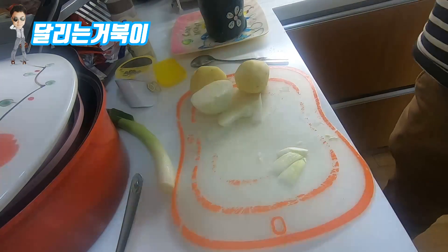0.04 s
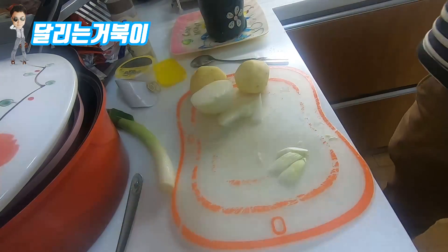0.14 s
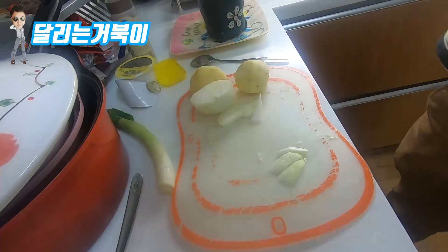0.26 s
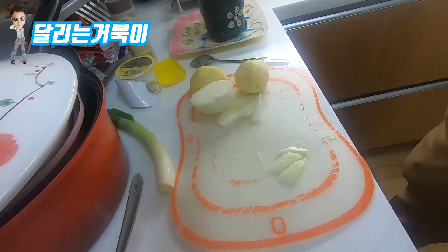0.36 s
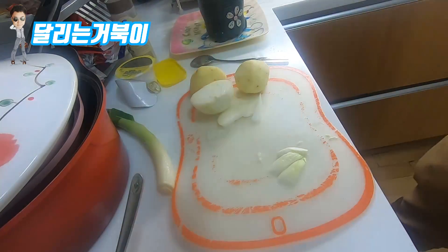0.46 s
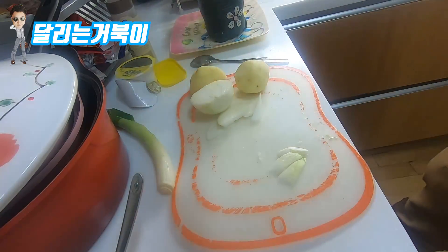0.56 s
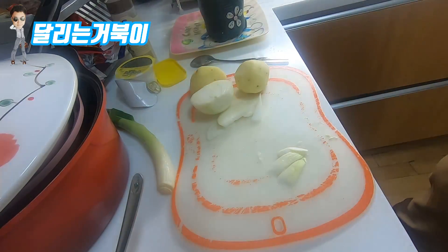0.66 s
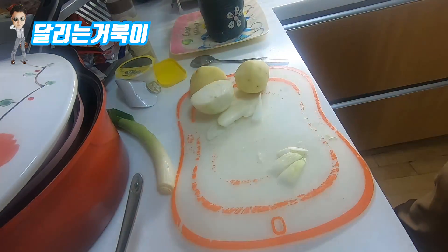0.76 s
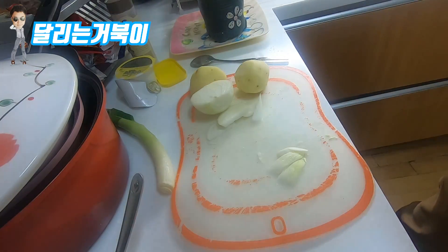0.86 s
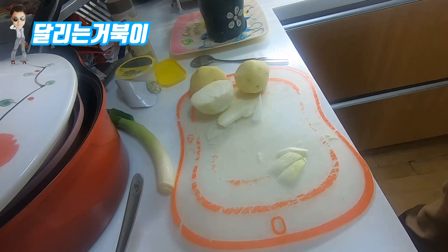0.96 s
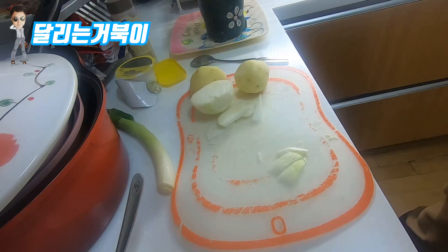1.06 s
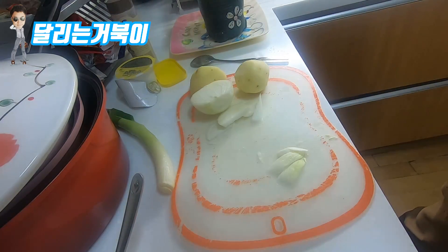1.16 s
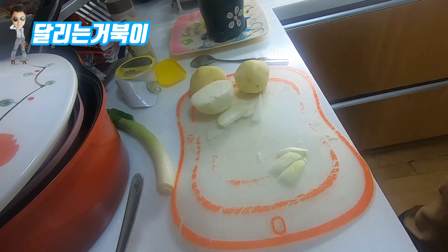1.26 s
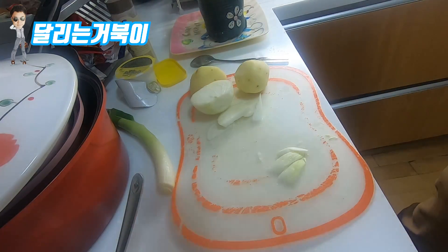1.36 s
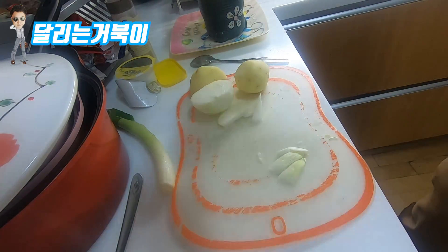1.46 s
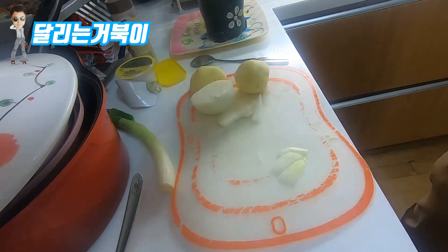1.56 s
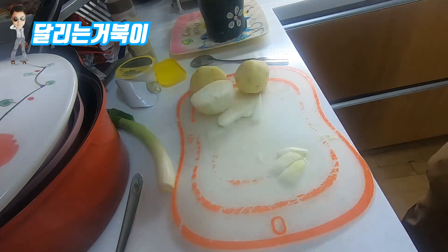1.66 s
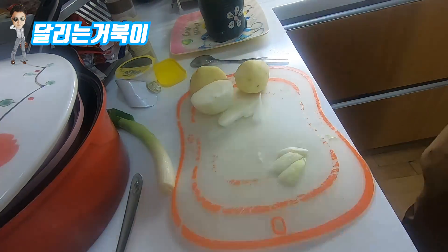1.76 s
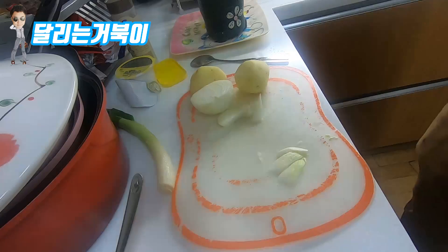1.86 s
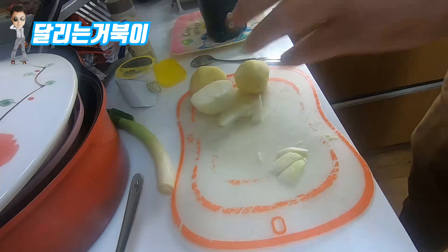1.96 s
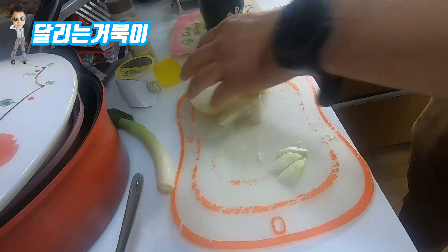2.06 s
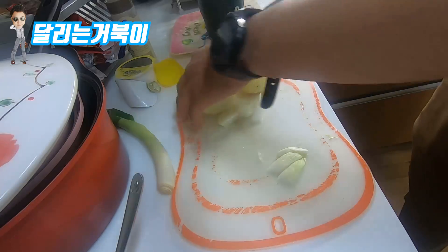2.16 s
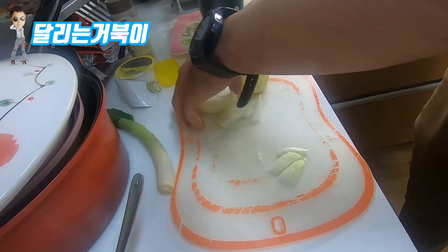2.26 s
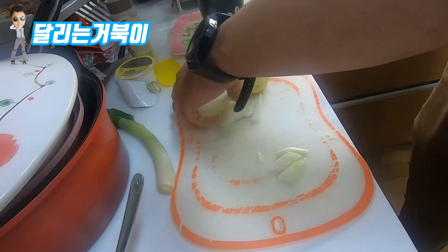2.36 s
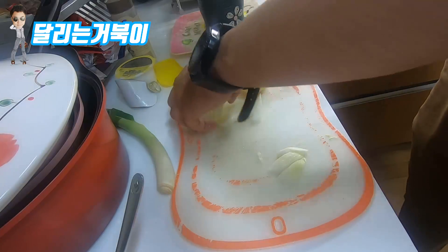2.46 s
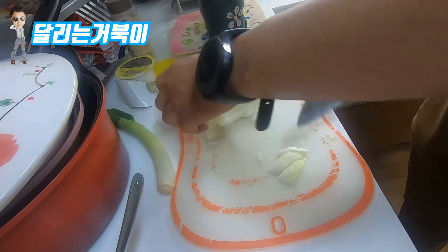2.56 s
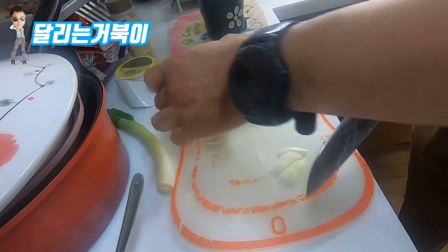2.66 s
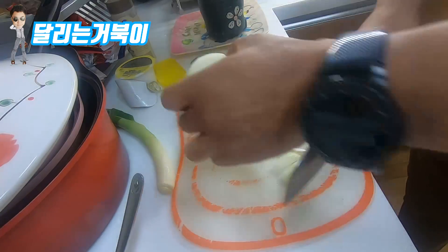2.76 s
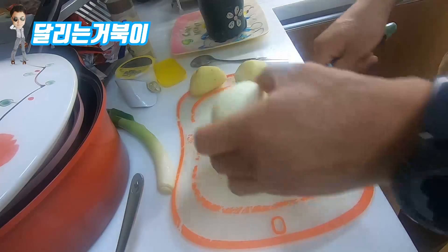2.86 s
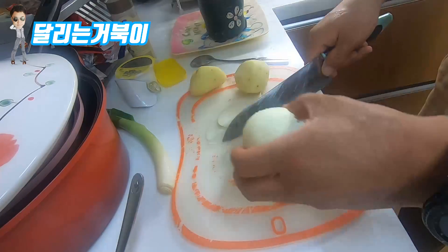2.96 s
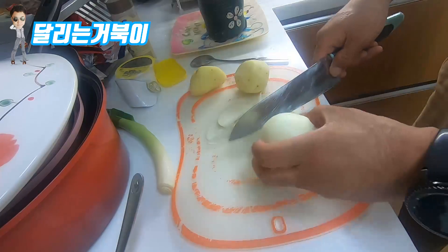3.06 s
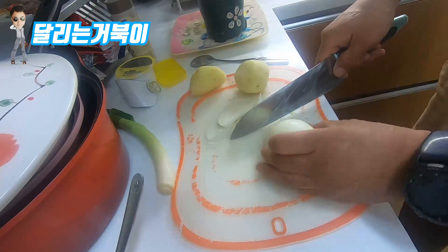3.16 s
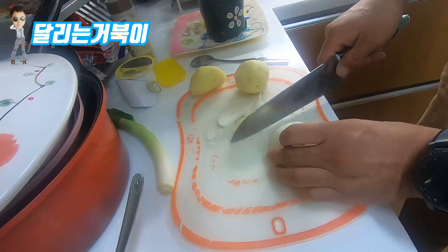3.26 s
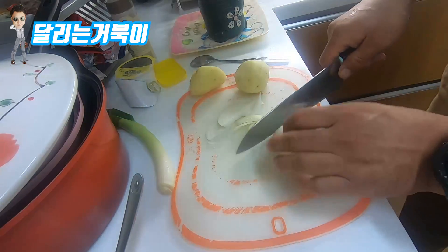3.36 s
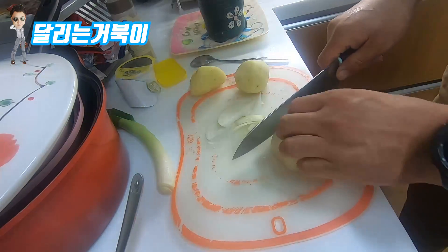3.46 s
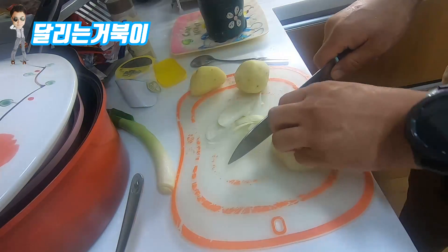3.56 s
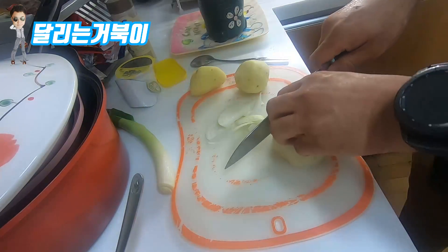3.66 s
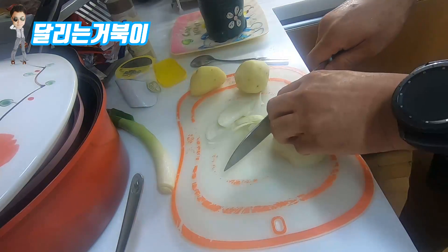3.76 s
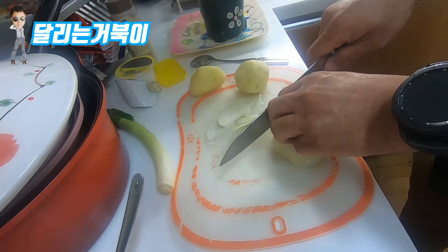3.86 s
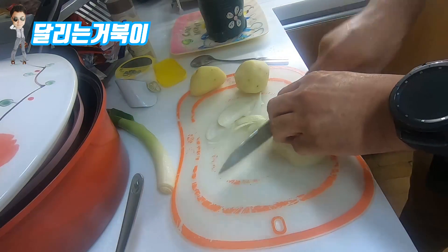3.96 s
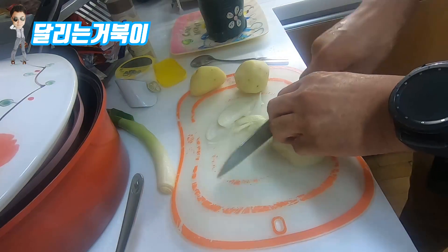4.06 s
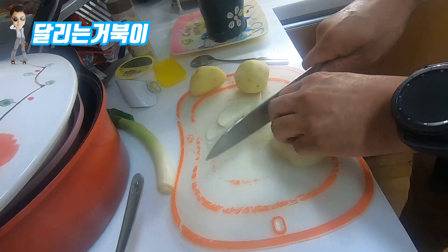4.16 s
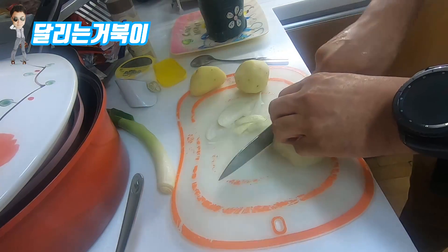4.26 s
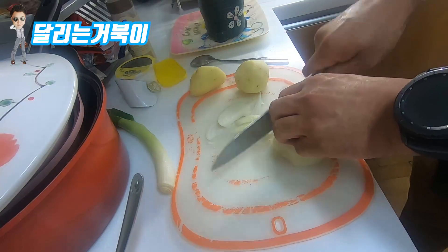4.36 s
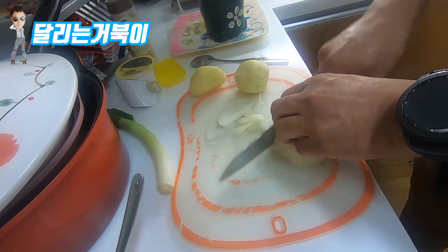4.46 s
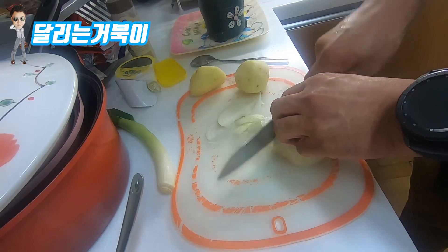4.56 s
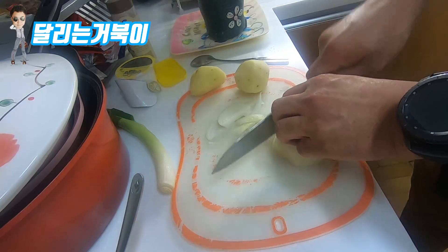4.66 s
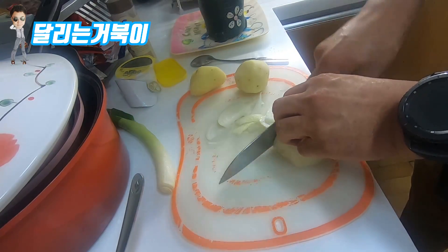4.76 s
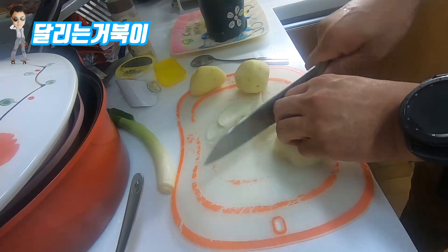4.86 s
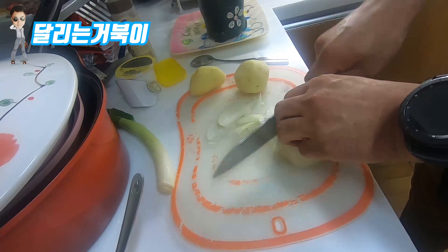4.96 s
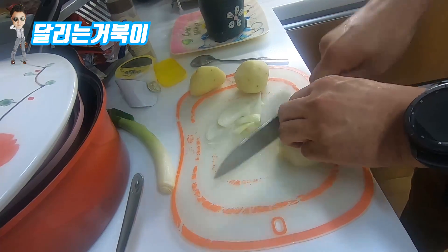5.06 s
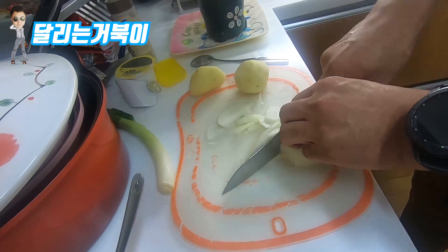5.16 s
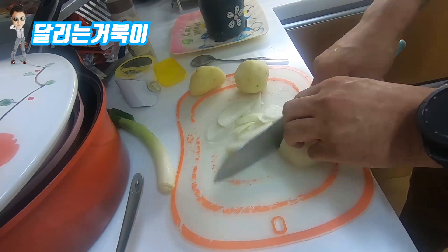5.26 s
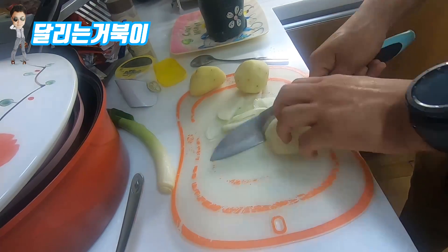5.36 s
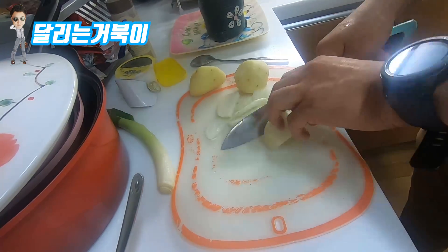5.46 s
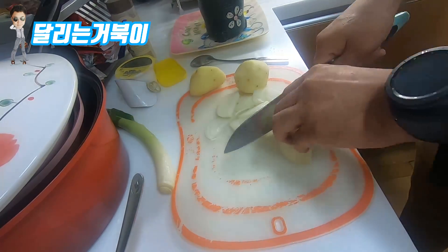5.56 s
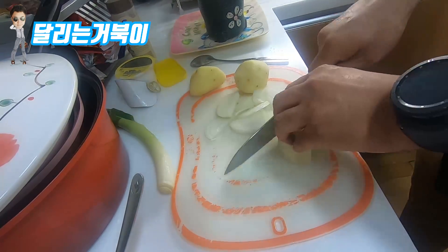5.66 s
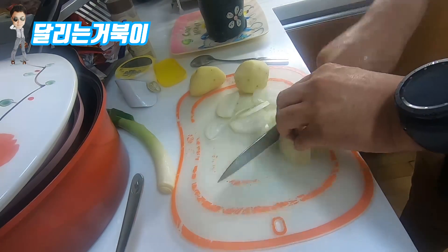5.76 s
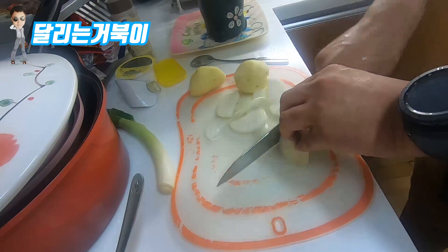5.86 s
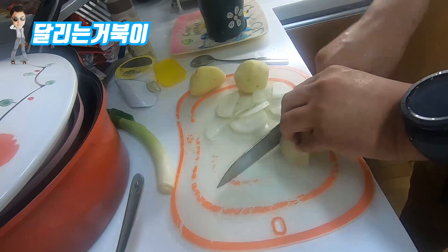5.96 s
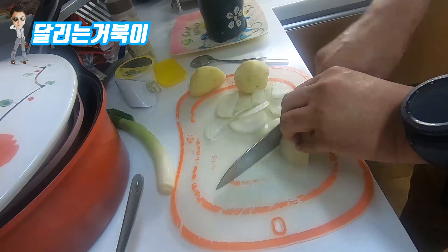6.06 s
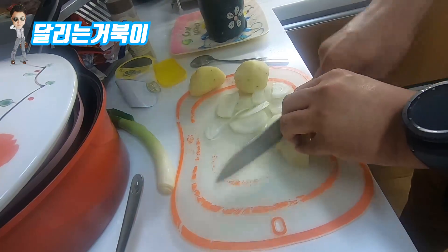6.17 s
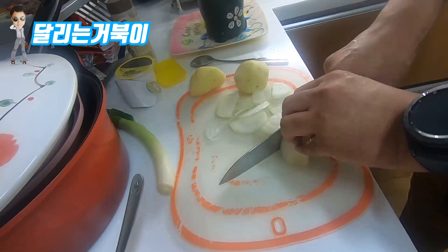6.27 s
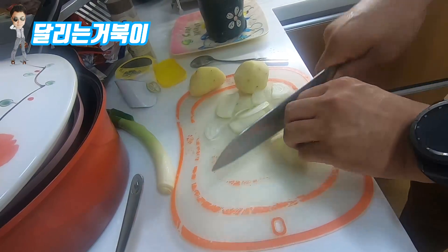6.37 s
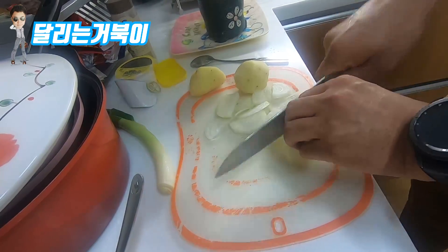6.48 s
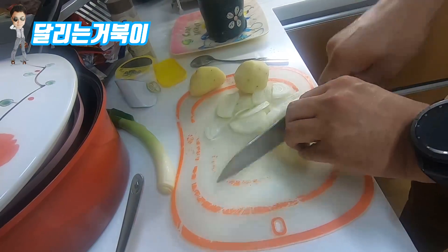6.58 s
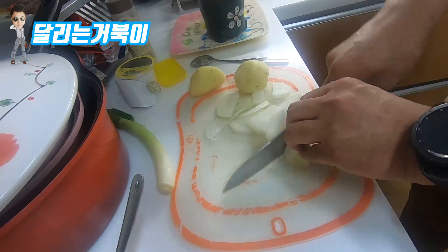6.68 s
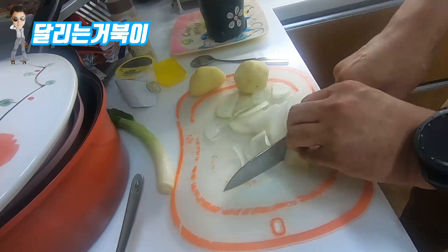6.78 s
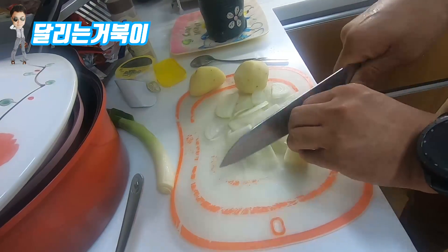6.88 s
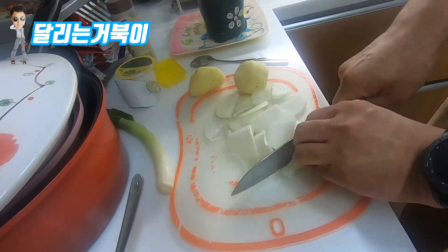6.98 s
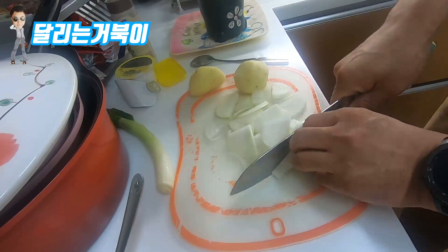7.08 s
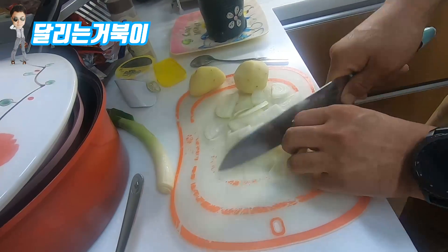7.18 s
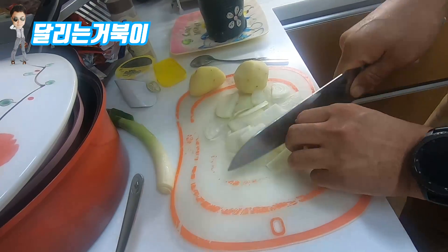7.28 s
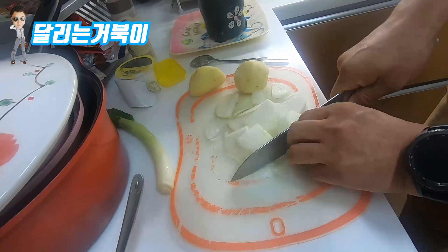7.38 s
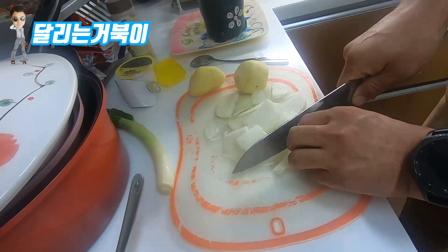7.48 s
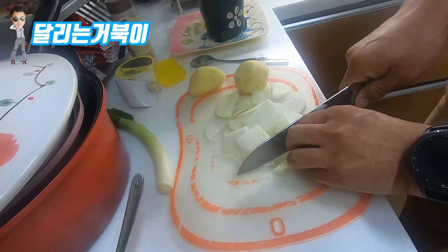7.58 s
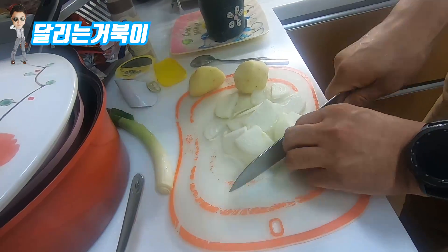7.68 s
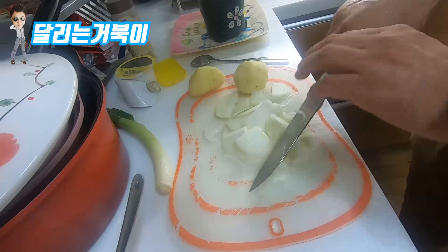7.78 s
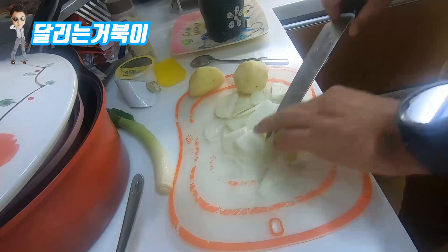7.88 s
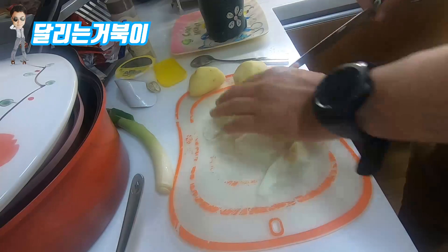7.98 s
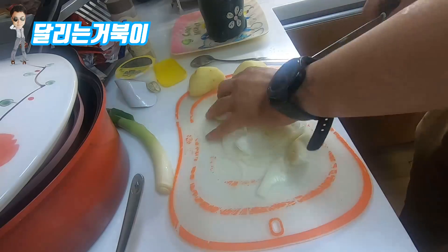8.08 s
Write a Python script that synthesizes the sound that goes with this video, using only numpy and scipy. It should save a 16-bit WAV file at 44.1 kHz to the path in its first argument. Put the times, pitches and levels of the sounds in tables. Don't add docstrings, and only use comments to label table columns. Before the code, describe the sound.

In a small, reflective kitchen heard close through a small camera microphone, fan-like hush and low rumble carry faint ticks and soft thuds. A blade tip taps and scrapes a plastic board, and an onion lands heavily. Slow strokes follow, each a wet crisp crunch ending in a hard ringing clack. Midway, playback speeds up, making the chops quicker, higher and shorter, with small rubs between groups.

```python
import sys
import numpy as np
from scipy import signal
from scipy.fft import rfft, irfft, next_fast_len
from scipy.io import wavfile
from scipy.ndimage import uniform_filter1d, map_coordinates

SR = 44100
rng = np.random.default_rng(int(sys.argv[2]) if len(sys.argv) > 2 else 0)


def generate_wav(signal):
    frames = np.transpose(np.atleast_2d(signal))
    scaled = np.clip(frames, -1, 1) * 32767
    pcm = np.round(scaled).astype(np.int16)
    wavfile.write(sys.argv[1], SR, pcm)


def decibels_to_gain(level_db):
    exponent = np.asarray(level_db, float) / 20
    return 10 ** exponent


N = 358516
SPEED_UP_S, SPEED = 4.983, 2.53
CUT = round(SPEED_UP_S * SR)
LONG = CUT + int(np.ceil((N - CUT) * SPEED))


def kitchen(s):
    return s + np.maximum(np.asarray(s) - SPEED_UP_S, 0) * (SPEED - 1)


def pace_at(s):
    return SPEED if s > SPEED_UP_S else 1


def add(track, s, sound):
    i = round(float(kitchen(s)) * SR)
    track[i:i + len(sound)] += sound[:len(track) - i]


def unit(x):
    return x / np.sqrt(np.mean(x ** 2) + 1e-20)


def along(points, hz, axis=1):
    rows = np.transpose(points)
    return np.interp(np.log(hz + 1), np.log(rows[0] + 1), rows[axis])


def filtered(x, response):
    m = next_fast_len(x.shape[-1] + SR // 2)
    return irfft(rfft(x, m) * response(np.fft.rfftfreq(m, 1 / SR)), m)[..., :x.shape[-1]]


def body(modes):
    def response(f):
        total = 0
        for k, (hz, width_hz, db) in enumerate(modes):
            mode = 1j * f / (hz * hz - f * f + 1j * f * width_hz) / 2
            total = total + (-1) ** k * decibels_to_gain(db) * SR / np.pi * mode
        return total
    return response


def pair(mid, side, alike):
    turn = np.arccos(np.clip(alike, -1, 1)) / 2
    return np.array([mid * np.cos(turn) + side * np.sin(turn), mid * np.cos(turn) - side * np.sin(turn)])


def grainy(count, spike_db):
    size = np.repeat(decibels_to_gain(spike_db * rng.exponential(size=count // 24 + 1)), 24)[:count]
    return unit(size * rng.standard_normal(count))


def burst(db, t60_s, length=SR // 40):
    t = np.arange(length) / SR
    return decibels_to_gain(db - 60 * t / t60_s) * rng.standard_normal(length)


def push(width_s):
    f = np.sin(np.linspace(0, np.pi, round(width_s * SR) + 3))
    return f / f.sum()


def ring(db, hz, width_hz, rise_s):
    t = np.arange(SR // 40) / SR
    return decibels_to_gain(db) * np.minimum(t / rise_s, 1) * np.exp(-np.pi * width_hz * t) * np.sin(2 * np.pi * hz * t)


def after(blows, shape):
    return np.abs(signal.fftconvolve(blows, shape(np.arange(4 * SR) / SR))[:LONG])


def patches(shape, size):
    over_hz = uniform_filter1d(rng.standard_normal(shape), size=size[0], axis=0)
    return unit(uniform_filter1d(over_hz, size=size[1], axis=1))


def pumping():
    pull_db, recover_s = 5.5, 0.5
    loud = np.zeros(LONG)
    for s, db, *_ in [*CHOPS, *DROPS]:
        add(loud, s, [decibels_to_gain(db + 3.5)])
    return -pull_db * (1 - np.exp(-after(loud, lambda t: np.exp(-t / recover_s))))


# frequency in Hz, level in dB per Hz.
HUSH = [(15, -65.5), (25, -27), (101, -47.5), (172, -2), (465, -19.5), (1130, -15), (1560, -19),
        (1880, -16.5), (2390, -25.5), (3040, -19.5), (3380, -21.5), (4310, -15), (7570, -15), (9380, -6),
        (11000, -20), (15200, -33)]
# frequency in Hz, width in Hz, height in dB.
HUMPS = [(195, 100, 8.5), (745, 100, 10.5), (1160, 270, 12), (2065, 600, 11.5), (2940, 400, 10),
         (3500, 350, -2), (4390, 530, 6), (6570, 390, 5), (9230, 264, 8), (9750, 180, 7.5)]
# frequency in Hz, left-right likeness (-1 to 1).
HUSH_ALIKE = [(60, 0.21), (130, 1), (290, 0.41), (640, -0.14), (1410, 0.36), (3100, 0.64), (6820, -0.11),
              (15000, 0.16)]


def hush():
    hush_db, dropout_hz, dropout_db = -47.5, 10600, -30
    masked_hz, masked_share = 7140, 0.38
    hz, t, z = signal.stft(rng.standard_normal((2, LONG + 1024)), SR, nperseg=1024)
    pull_db = pumping()
    field_db = 1.2 * patches(z.shape[1:], size=(8, 6))
    lost = (patches(z.shape[1:], size=(5, 4)) < -0.75) & (hz > dropout_hz)[:, None]
    masked_db = masked_share * np.outer(hz > masked_hz, np.interp(t * SR, np.arange(LONG), pull_db))
    colour_db = along(HUSH, hz) + sum(db / (1 + (2 * (hz - c) / w) ** 2) for c, w, db in HUMPS)
    gain_db = colour_db[:, None] + field_db + dropout_db * lost + masked_db
    z = pair(*z, along(HUSH_ALIKE, hz)[:, None]) * decibels_to_gain(gain_db)
    air = signal.istft(z, SR, nperseg=1024)[1][:, :LONG]
    return decibels_to_gain(hush_db + pull_db + [[-1.2], [1.2]]) * unit(air)


def shake(counter):
    rest_db, sway_db, sway_s = -83, -25.5, 0.14
    t = np.arange(SR) / SR
    blows = signal.fftconvolve(counter, (1 - np.exp(-t / 0.01)) * decibels_to_gain(-60 * t / 0.32))[:LONG]
    sway = after(counter, lambda t: (t / sway_s) ** 2 * np.exp(2 - 2 * t / sway_s))
    level = blows + decibels_to_gain(sway_db) * sway + decibels_to_gain(rest_db)
    ports = pair(*rng.standard_normal((2, LONG)), -0.4)
    mount = body([(20, 14, -16), (40, 14, 0), (88, 25, -8)])
    low = filtered(ports, lambda f: mount(f) / (1 + (f / 130) ** 4))
    return decibels_to_gain([[-2.2], [2.2]]) * level * unit(low)


# start in seconds, level in dB, colour in Hz as heard.
TICKS = [
    (0.3862, -45, 1110),
    (0.5184, -43, 915),
    (1.3668, -34.5, 4200),
    (1.9801, -41, 3160),
    (5.5378, -38.5, 5440),
    (5.5562, -43, 5340),
    (7.221, -35.5, 6100),
    (7.5178, -40.5, 8500),
    (7.9818, -53, 2870),
]


def ticks():
    out = np.zeros(LONG)
    for s, db, hz in TICKS:
        source_hz = hz / pace_at(s)
        shell = body([(source_hz, 0.7 * source_hz, 0)])
        snap = filtered(burst(0, 0.054, SR // 50), lambda f: shell(f) ** 2)
        add(out, s, decibels_to_gain(db + 5.0) * snap / np.abs(snap).max())
    return out


# start in seconds, rise in seconds, fade in seconds, level in dB, colour in Hz as heard.
RUBS = [(.79, 0.0065, .07, -51, 1460), (0.801, 0.0038, 0.043, -46.5, 260), (1.975, .0014, 0.046, -52, 2420),
        (2.4, 0.00059, 0.01, -23.5, 3440), (3.14, 0.001, .005, -29.5, 2560),
        (3.28, 0.0038, 0.0033, -34.5, 2400), (5.333, 0.017, 0.0085, -24, 6500),
        (5.448, 0.0021, 0.01, -46.5, 8450), (5.488, .0044, .0036, -42, 6570),
        (5.565, .008, 0.01, -39.5, 6000), (5.591, 0.011, 0.0095, -38.5, 6000),
        (5.656, 0.026, 0.0068, -36, 6000), (6.825, 0.00069, 0.0075, -39, 3000),
        (7.004, 0.0018, .004, -41.5, 4940), (7.435, 0.0062, .01, -38, 8000)]


def rubs():
    out = np.zeros(LONG)
    for s, rise_s, fade_s, db, hz in RUBS:
        pace, hold_s = pace_at(s), fade_s
        t = np.arange(round((rise_s + hold_s + 5 * fade_s) * pace * SR)) / SR / pace
        fade = np.exp(-np.maximum(t - rise_s - hold_s, 0) / fade_s)
        stroke = np.minimum(t / rise_s, 1) ** 2 * fade
        skin = body([(hz / pace, 1.01 * hz / pace, 0)])
        grit = filtered(grainy(len(t), spike_db=2.5), lambda f: skin(f) ** 2 / (1 + (f * pace / hz / 2.3) ** 4))
        add(out, s, decibels_to_gain(db) * stroke * unit(grit))
    return out


# frequency in Hz, width in Hz, level in dB.
HEAP = [(107.3, 9.8, -16.5), (175, 20, -16), (215, 7.2, -16.5), (315, 91, 2), (417, 110, -1),
        (560, 110, -6.5), (740, 210, -10.5)]


def loaded_board(force):
    return filtered(force, body(HEAP))


# frequency in Hz, level in dB per Hz.
FLESH = [(530, -25.5), (900, -16), (1200, -10), (3800, -5), (7590, -20), (9740, -22), (13600, -35.5),
         (15500, -67.5)]


def crisp(noise):
    colour = lambda f: decibels_to_gain(along(FLESH, f))
    gain = np.sqrt(np.mean(colour(np.linspace(1, SR / 2, 999)) ** 2))
    return filtered(noise, colour) / gain


# start in seconds, boom in dB, slap in dB, counter thump in dB.
DROPS = [(0.796, -42, -34.5, -62), (0.861, -40.5, -33, -45), (.92, -53, -56, -70), (1.0, -50.5, -66, -52),
         (1.22, -62.5, -66, -78), (2.27, -62.5, -58, -48), (2.406, -42, -34, -70), (2.799, -39, -56, -59),
         (3.151, -19, -15.5, -56), (3.212, -27, -33, -28), (3.2861, -1.5, -9, -24.5),
         (5.585, -32.5, -42, -50), (7.453, -18.5, -15.5, -41)]


def drops():
    force, slap, counter = np.zeros((3, LONG))
    for s, boom_db, slap_db, thump_db in DROPS:
        add(force, s, decibels_to_gain(boom_db) * push(0.00035))
        add(slap, s, burst(slap_db, 0.0057))
        add(counter, s, [decibels_to_gain(thump_db)])
    return loaded_board(force), crisp(slap), counter


# start in seconds, level in dB, ring in Hz, width in Hz, crack in dB.
TAPS = [
    (2.7629, 3.5, 2204, 139, -9.5),
    (3.1469, 13, 2550, 450, -19),
]


def taps():
    tone, crack = np.zeros((2, LONG))
    for s, db, hz, width_hz, crack_db in TAPS:
        add(tone, s, ring(db, hz, width_hz, rise_s=0.0013))
        add(crack, s, burst(crack_db, 0.0073))
    return tone, crisp(crack)


# time in seconds, level in dB, blade ring over the grit in dB.
SCRAPE = [
    (2.81, -40, -19),
    (2.82, -42.5, 1),
    (2.84, -24, 10),
    (2.874, -14.5, -0.5),
    (2.952, -18.5, -24.5),
    (2.96, -17.5, 3.5),
    (3.08, -55.5, -25),
]
# frequency in Hz, level in dB per Hz.
GRIT = [(290, -58), (500, -38), (1670, -14.5), (1750, -13), (2840, -1.5), (4250, -3.5), (9510, -13.5),
        (13000, -22), (15500, -46.5)]


def scrape():
    out = np.zeros(LONG)
    s, db, ring_db = np.transpose(SCRAPE)
    t = np.arange(s[0], s[-1], 1 / SR)
    grit = grainy(len(t), spike_db=-1.0)
    tone = unit(filtered(grit, body([(2100, 340, -13), (2940, 180, 2)])))
    rough = unit(filtered(grit, lambda f: decibels_to_gain(along(GRIT, f))))
    add(out, s[0], decibels_to_gain(np.interp(t, s, db)) * (rough + decibels_to_gain(np.interp(t, s, ring_db)) * tone))
    return out


def layers(count):
    per_s, snap_size, decay_s = 90, 2.3, 0.0004
    snaps = (rng.random(count) < per_s / SR) * rng.exponential(size=count)
    return 1 + snap_size * np.convolve(snaps, np.exp(-np.arange(300) / SR / decay_s))[:count]


# start in seconds, length in seconds, crunch in dB.
CUTS = [(4.0336, .0345, -26), (4.289, .033, -28), (4.519, 0.047, -29.5), (4.753, 0.02, -31),
        (4.983, 0.025, -31.5), (5.087, 0.011, -28.5), (5.185, 0.027, -31.5), (5.258, 0.024, -47),
        (5.84, 0.018, -28.5), (5.928, 0.0088, -28.5), (6.018, .011, -29.5), (6.109, .012, -31),
        (6.203, 0.014, -29.5), (6.294, 0.025, -28), (6.498, 0.018, -27.5), (6.601, .0175, -26),
        (6.702, 0.017, -28), (6.83, .015, -30), (7.01, 0.03, -34), (7.68, 0.036, -34.5)]


def cuts():
    force, crunch = np.zeros((2, LONG))
    for start, length_s, crunch_db in CUTS:
        push_db = -21 + (crunch_db + 30)
        u = np.linspace(0, 1, round(float(kitchen(start + length_s) - kitchen(start)) * SR))
        stroke = np.minimum(22 * u, 1) * (0.53 + 1.1 * np.exp(-u / 0.42))
        snapping = unit(layers(len(u)) * grainy(len(u), spike_db=5.0))
        add(crunch, start, decibels_to_gain(crunch_db) * stroke * snapping)
        add(force, start, decibels_to_gain(push_db + 4.5) * push(0.0021))
        add(force, start, decibels_to_gain(push_db - 23.5) * stroke * rng.standard_normal(len(u)))
    return loaded_board(force), crisp(crunch)


# start in seconds, clack in dB, ring in Hz,
# board boom and edge crack, both in dB relative to the clack.
CHOPS = [(4.0697, 8.5, 2295, -17, -7), (4.326, 7.5, 2210, -17, -8), (4.5674, 6, 2060, -20, -19.5),
         (4.784, 7.5, 2050, -13.5, -10.5), (5.0009, 6.5, 1990, -18, -13.5), (5.1053, 7, 2117, -19, -11.5),
         (5.272, 7, 2153, -21.5, -20), (5.8473, 6.5, 2200, -12.5, -19.5), (5.9422, 6.5, 2175, -15, -11.5),
         (6.0333, 7, 2224, -17, -20), (6.124, 7.5, 2250, -17, -18.5), (6.2165, 7.5, 2476, -15.5, -17),
         (6.3121, 6.5, 2300, -17.5, -13.5), (6.5136, 7, 2440, -15.5, -11.5), (6.6179, 6.5, 2446, -15, -16),
         (6.7222, 7, 2230, -17, -18), (6.8498, 7, 2420, -14.5, -13.5), (7.031, 6, 2350, -14, -23),
         (7.707, 7, 2250, -18, -23)]
# frequency in Hz, width in Hz, level in dB.
BOARD = [(102.8, 6.6, -18), (176, 17, 1), (260, 17.8, 0), (316.6, 43, 4), (432, 133, -12.5),
         (523, 60, -17.5), (708, 45, -13.5), (863, 46, -17)]
# frequency in Hz, width in Hz, level in dB.
BLADE = [(930, 2180, -1), (2116, 580, 2), (4000, 1210, -0.5), (6740, 900, -12)]


def chops():
    contact_s, thump_db, thump_db_per_s = 0.00006, -33.5, 3
    board, blade, clack, edge, counter = np.zeros((5, LONG))
    for s, db, hz, boom_db, crack_db in CHOPS:
        add(clack, s, ring(db + 1.5, hz, width_hz=188, rise_s=0.00027))
        add(blade, s, decibels_to_gain(db + 1.0) * push(contact_s))
        add(edge, s, burst(db + crack_db + 0.5, 0.013))
        add(board, s, decibels_to_gain(db + boom_db + 2) * push(0.00086))
        add(counter, s, [decibels_to_gain(db + thump_db + thump_db_per_s * (s - CHOPS[0][0]))])
    return filtered(board, body(BOARD)), filtered(blade, body(BLADE)), clack + crisp(edge), counter


def ducking():
    t = np.arange(SR) / SR
    dip_db = np.zeros(LONG)
    for s, *_ in CHOPS:
        add(dip_db, s + 0.00022, -6 * (1 - np.exp(-t / 0.002)) * np.exp(-t / 0.098))
    return decibels_to_gain(dip_db)


# frequency in Hz, t60 in seconds, level in dB.
ROOM = [(60, 0.28, -43), (133.7, 0.16, -8.5), (253, 0.69, -11.5), (550, 0.46, 6), (1330, 0.68, 1),
        (2200, 0.49, -2.5), (3770, 0.49, -7.5), (6000, 0.67, -11), (8000, 0.47, -6.5), (12000, .25, -14)]
# frequency in Hz, left-right likeness (-1 to 1).
ROOM_ALIKE = [(60, 0.93), (130, 0.42), (290, 1), (640, 0.64), (1410, 0.1), (3100, 0.81), (6820, 0.15),
              (15000, -0.97)]


def room(x):
    out, step = np.zeros((2, LONG + 2 * SR)), SR // 4
    for i in range(0, LONG, step):
        hz, t, z = signal.stft(rng.standard_normal((2, SR * 3 // 4)), SR, nperseg=256)
        decay = decibels_to_gain(-60 * t / along(ROOM, hz)[:, None])
        early = 1 + 2.85 * decibels_to_gain(-60 * t / 0.045)
        level = decibels_to_gain(along(ROOM, hz, axis=2)) / np.linalg.norm(decay, axis=1)
        z = pair(*z, along(ROOM_ALIKE, hz)[:, None]) * early * decay * level[:, None]
        tail = signal.istft(z, SR, nperseg=256)[1] / np.sqrt(128)
        wet = signal.fftconvolve(x[None, i:i + step], tail, axes=1)
        out[:, i + 100:][:, :wet.shape[1]] += wet
    return out[:, :LONG]


def ports(air, wood):
    def across(f):
        mid = 0.8j * f / (f + 3000) * np.cos(f / 900)
        treble = 0.79 * np.exp(-1j * f / 420) / (1 + (3200 / (f + 1)) ** 4)
        return mid + treble
    difference = filtered(air, across) + 0.08 * wood
    return np.array([decibels_to_gain(-2.5) * (air + difference), decibels_to_gain(-1.34) * (air - difference)])


def speed_up(whole):
    slow = filtered(whole, lambda f: f < 15100)[:, :CUT]
    fast = filtered(whole[:, CUT:], lambda f: (f < 6300) / (1 + (f / 7000) ** 4))
    where = np.arange(N - CUT) * SPEED
    return np.hstack([slow, [map_coordinates(ch, [where], order=3) for ch in fast]])


def scene():
    close = ticks() + rubs() + scrape()
    drop_boom, slap, drop_thump = drops()
    tap_tone, tap_crack = taps()
    cut_boom, crunch = cuts()
    chop_boom, blade, clack, chop_thump = chops()
    wood = drop_boom + cut_boom + chop_boom
    spread = blade + slap + tap_crack + crunch
    near = ports(wood + tap_tone + spread + clack + close, wood)
    wet = room(spread + 0.33 * tap_tone + 0.36 * wood + 0.34 * close)
    return speed_up(ducking() * (near + wet + shake(drop_thump + chop_thump) + hush()))


def top_cut(x):
    return signal.sosfilt(signal.butter(12, 16330, fs=SR, output="sos"), x)


def record(dry):
    ceiling = 1.03
    flat = dry / (1 + np.abs(dry / ceiling) ** 10) ** (1 / 10)
    return top_cut(flat)


dry = scene()
out = record(dry)
generate_wav(out)
```